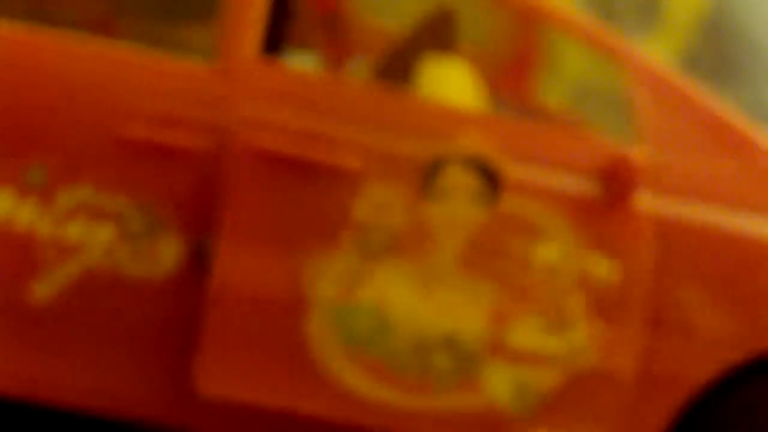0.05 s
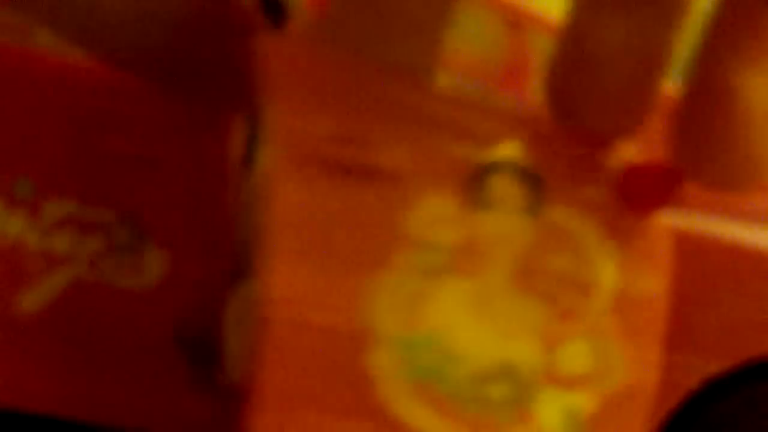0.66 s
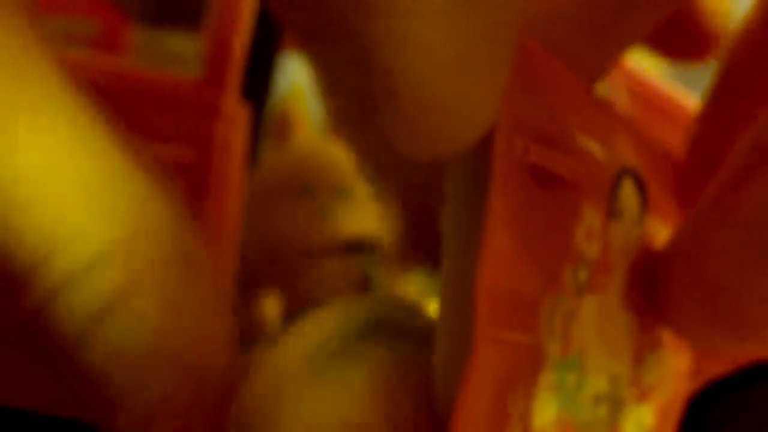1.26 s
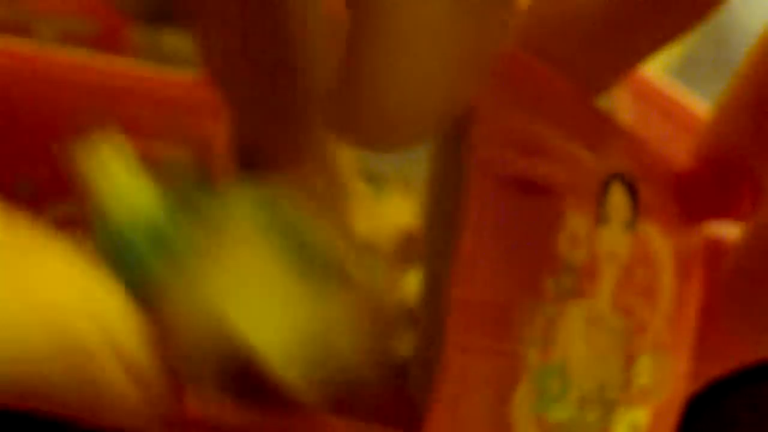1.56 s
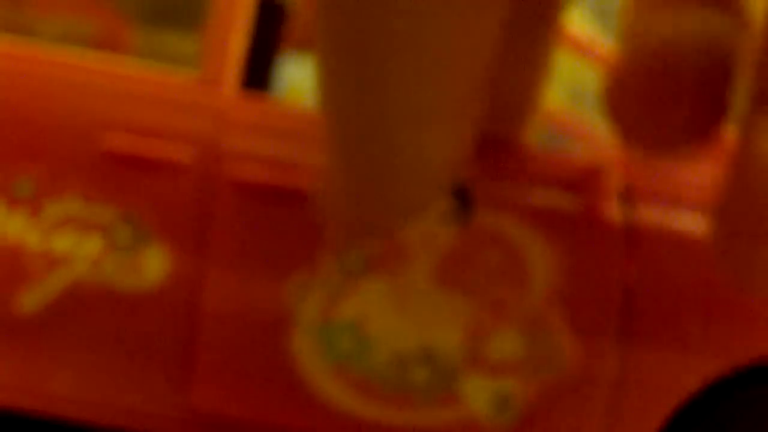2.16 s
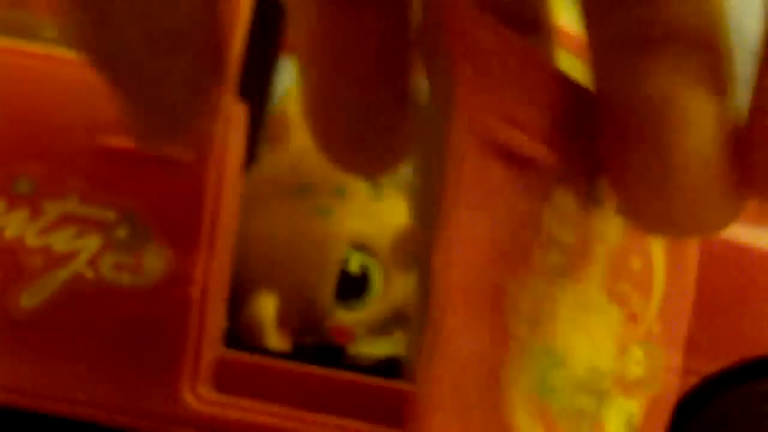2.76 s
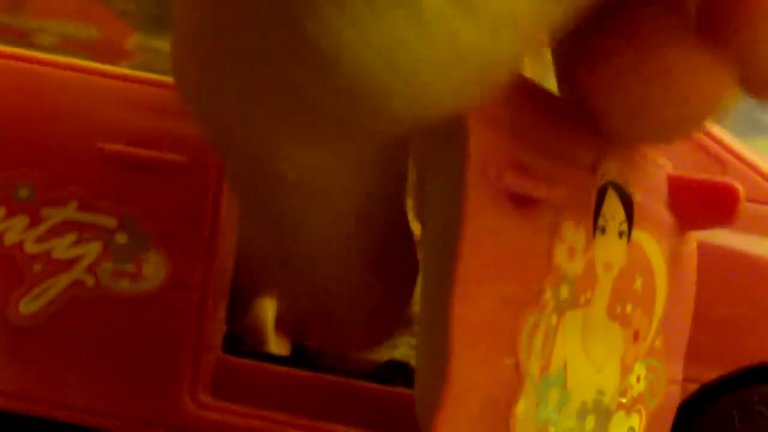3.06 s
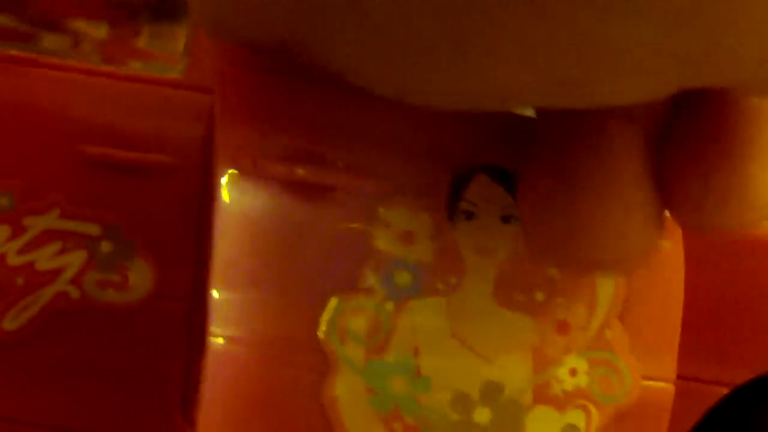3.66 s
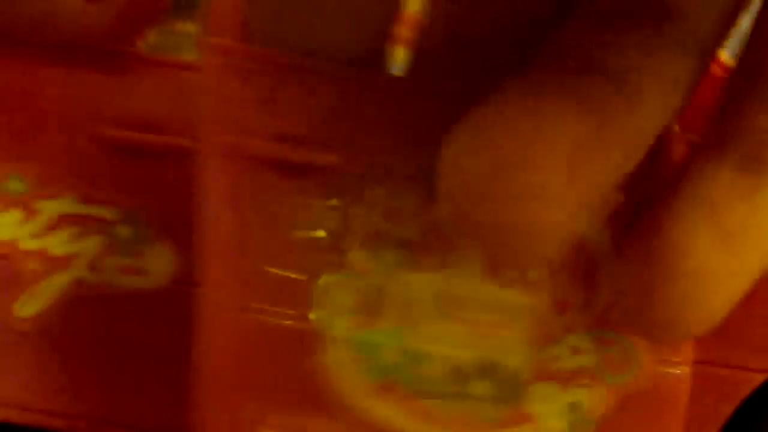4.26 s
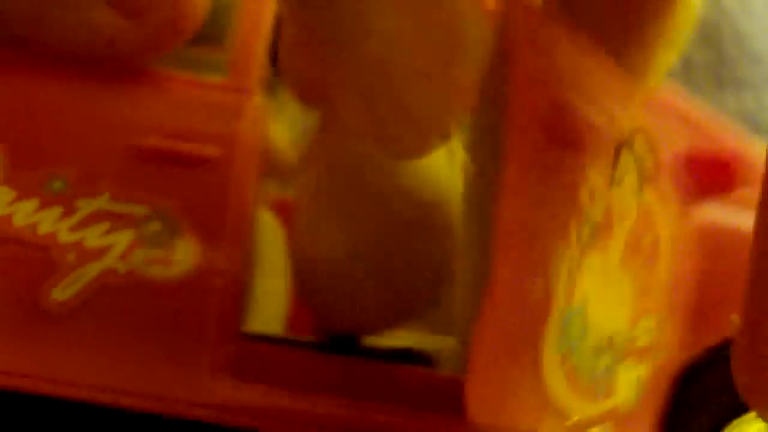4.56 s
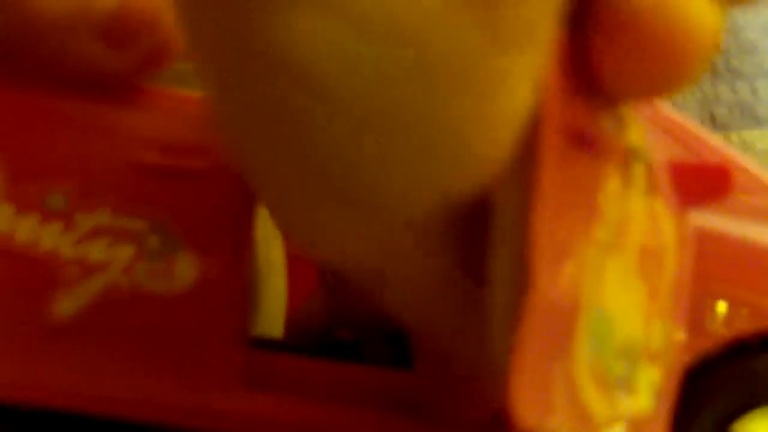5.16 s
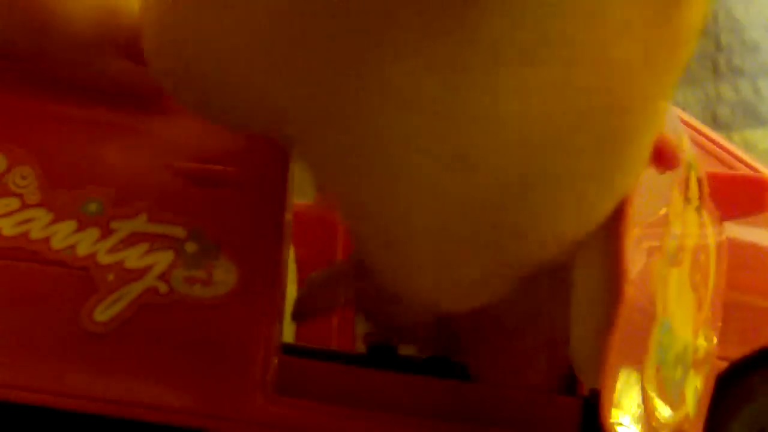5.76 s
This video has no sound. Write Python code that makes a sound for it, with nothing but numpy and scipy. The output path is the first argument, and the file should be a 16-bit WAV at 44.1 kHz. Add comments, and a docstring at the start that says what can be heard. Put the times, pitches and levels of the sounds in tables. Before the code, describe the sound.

Fingers handle a hollow plastic toy car close to the microphone, with soft rubbing and light ticks over faint noise in a small, quiet room. A small knock comes at about 0.7 seconds. From 1 to 1.6 seconds, little figurines tap and slide inside with a brief squeak. At 2.4 seconds the door gives a sharp plastic knock, trailed by smaller ones. A few figurine taps follow around 3 seconds, then the rubbing gets busier, with light knocks and short scrapes on the shell. The loudest snap lands at 4.6 seconds as the door is worked, followed by a quick cluster of bright latch clicks near 4.75 seconds. Another knock comes at about 5.4 seconds, and the figurines clatter briefly around 5.7 seconds. Every contact is short and fairly dry.

```python
"""Fingers rub and bump a hollow plastic toy car, close by, over faint room noise. The shell knocks, small
figurines tap and slide inside, and later the door latch snaps as hands open and shut the door.
Each impact excites the damped modes of a plastic part; rubbing and scraping are stick-slip friction
driving those modes. A small, quiet room answers the louder blows."""
import sys
import numpy as np
from scipy import signal
from scipy.fft import rfft, irfft, next_fast_len
from scipy.io import wavfile
from scipy.ndimage import uniform_filter1d

SR = 44100
rng = np.random.default_rng(int(sys.argv[2]) if len(sys.argv) > 2 else 0)


def bounce(signal):
    """Save signal as a 16-bit WAV file at the path given by the first command-line argument."""
    frames = np.transpose(np.atleast_2d(signal))
    limited = np.clip(frames, -1, 1)
    pcm = np.round(limited * 32767).astype(np.int16)
    wavfile.write(sys.argv[1], SR, pcm)


N = 260187
ATTACK_S, HIT_S = .0075, .2  # the onset that sets a blow's colour; the longest a contact sounds


def undb(db):
    """Decibels to amplitude ratio."""
    return 10 ** (np.asarray(db) / 20)


def unit(x):
    """Normalisation to rms 1."""
    return x / np.sqrt(np.mean(x ** 2) + 1e-18)


def add(track, start_s, sound):
    """Superposition: a sound sums into the track."""
    i = int(start_s * SR)
    track[i:i + len(sound)] += sound[:len(track) - i]


def fade(t, t60):
    """Exponential decay, 60 dB down at t60."""
    return np.exp(-np.log(1000) * t / t60)


def low_cut(x, hz, order=2):
    """Butterworth high-pass."""
    return signal.sosfilt(signal.butter(order, hz, "high", fs=SR, output="sos"), x)


def colour(x, points):
    """Minimum-phase filter through (frequency_hz, gain_db) points, by folding the cepstrum."""
    n = 2 * next_fast_len(len(x) // 2 + 2048)
    hz, db = np.transpose(points)
    f = np.maximum(np.arange(n // 2 + 1) * SR / n, 1)
    cepstrum = irfft(np.log(undb(np.interp(np.log(f), np.log(hz), db))))
    cepstrum[1:n // 2] *= 2
    cepstrum[n // 2 + 1:] = 0
    return irfft(rfft(x, n) * np.exp(rfft(cepstrum)))[:len(x)]


# Spectra of the room's air and rumble: frequency_hz, gain_db
AIR_SPECTRUM = [(100, 3), (180, -13.5), (280, 7), (700, 3), (920, -15), (1300, -0.5), (3000, -10.5),
                (6000, -11), (11000, -15.5), (16000, -21.5)]
RUMBLE_SPECTRUM = [(10, -1), (25, -1), (60, -14), (120, -21), (250, -20.5), (1000, -55.5)]
def background(air_db=-70.0, rumble_db=-68.5, hiss_db=-91):
    """Ambient noise in two channels: the air is coherent, the rumble partly so, the hiss incoherent."""
    air = unit(low_cut(colour(rng.standard_normal(N), AIR_SPECTRUM), hz=90))
    shared = rng.standard_normal(N)
    rumble = np.array([unit(colour(0.73 * shared + rng.standard_normal(N), RUMBLE_SPECTRUM))
                       for _ in range(2)])
    return undb(air_db) * air + undb(rumble_db) * rumble + undb(hiss_db) * rng.standard_normal((2, N))


def press(t, length_s, rise_s, release_s):
    """Contact pressure: a smooth rise, a hold until length_s, an exponential release."""
    return np.sin(np.pi / 2 * np.clip(t / rise_s, 0, 1)) * fade(np.maximum(t - length_s, 0), release_s)


def wander(rate_hz):
    """Low-pass random fluctuation of rms 1: held values, smoothed twice."""
    hold = int(SR / rate_hz)
    steps = np.repeat(rng.standard_normal(N // hold + 1), hold)
    return unit(uniform_filter1d(uniform_filter1d(steps, hold), hold)[:N])


def slips(n, per_s, spread_db):
    """Stick-slip friction: tiny releases at random moments, a few much larger than the rest."""
    size = undb(spread_db * np.minimum(rng.exponential(size=n), 4))
    return unit((rng.random(n) < per_s / SR) * size * rng.choice([-1, 1], n))


def ring(modes, t, t60, scatter_db, detune):
    """Free vibration: a sum of damped modes, weighted and tuned anew by each contact point and grip."""
    hz, db, decay_ratio = np.transpose(modes)[:, :, None]
    weight, pitch = rng.standard_normal((2, len(modes), 1))
    sign = rng.choice([-1, 1], (len(modes), 1))
    amplitude = sign * undb(db + scatter_db * weight) * fade(t, t60 * decay_ratio)
    return np.sum(amplitude * np.sin(2 * np.pi * hz * (1 + detune * pitch) * t), axis=0)


def drive_part(force, modes, t60, wall_db):
    """Forced vibration: the force is convolved with the response of hand-damped modes and walls."""
    t = np.arange(int(HIT_S * SR) // 2) / SR
    modal = unit(ring(modes, t, t60, scatter_db=4, detune=0.037))
    walls = unit(rng.standard_normal(len(t)) * fade(t, t60))
    return signal.fftconvolve(force, modal + undb(wall_db) * walls)[:len(force)]


# Modes of the car's shell: pitch_hz, level_db, t60_ratio
CAR_MODES = [(374, -2.5, 0.92), (546, -2.5, 0.84), (780, -10.5, 1.6), (918, 3, 1.8), (1036, -9, 0.51),
             (1443, -2, 1.4), (1690, -6, 1), (1754, -5, 0.86), (2177, 2, 1), (2300, 0, 0.5),
             (3446, -2.5, 0.31), (3386, 1, 1), (4080, -3.5, 1.7), (4760, -5, 1), (4740, -7, 2.7),
             (6140, -9.5, 0.72), (6730, 5.5, 0.34), (7290, -2, 1.1), (8560, -1, 0.23), (10200, -6, 0.54),
             (10600, -9.5, 1.1), (11400, -17.5, 1)]
# Spectra of the rubbed body and of dry skin: frequency_hz, gain_db
RUB_SPECTRUM = [(100, -23), (220, -16.5), (330, -14.5), (700, 1), (930, -0.5), (1200, 4.5), (1450, -5.5),
                (1900, -8.5), (2700, 1.5), (4500, -17), (7000, -19.5), (16000, -49)]
SKIN_SPECTRUM = [(1500, -25.5), (3500, 0), (6500, 1.5), (9000, 0.5), (11500, -0.5), (13500, -6.5),
                 (16000, -12.5)]
def rubbing(n, skin_db):
    """Sliding friction: skin drags the shell into resonance and hisses above it."""
    drag = drive_part(slips(n, per_s=1400, spread_db=4), CAR_MODES, t60=0.015, wall_db=15)
    hiss = colour(slips(n, per_s=3500, spread_db=4), SKIN_SPECTRUM)
    return unit(colour(drag, RUB_SPECTRUM)) + undb(skin_db) * unit(hiss)


STROKE_RISE_S, STROKE_RELEASE_S = 0.022, 0.23
HOLD_DB = -71.5  # the hand merely holding the toy
# Finger strokes over the toy: start_s, length_s, relative_level_db, skin_over_rub_db
FINGER_STROKES = [(0.0, 0.11, -59, -7), (0.522, 0.073, -64, -8), (0.763, 0.11, -63, -8),
                  (1.969, 0.052, -60, -6), (2.203, 0.18, -77.5, 4), (2.462, 0.16, -59, -3.5),
                  (2.671, 0.063, -61, 1.5), (2.879, 0.082, -64, -9), (3.008, 0.17, -54, -6.5),
                  (3.216, 0.091, -61, -6), (3.379, 0.13, -59.5, -2.5), (3.5, 0.085, -58.5, 0),
                  (3.719, 0.13, -57.5, -10), (4.028, 0.082, -61, -13), (4.188, 0.15, -56.5, -5.5),
                  (4.408, 0.17, -61, -6), (4.604, 0.26, -57, 0.5), (4.923, 0.15, -73.5, 3),
                  (5.129, 0.19, -61, 0), (5.442, 0.074, -63, 0), (5.707, 0.12, -66, -3)]
def fingers(grip_wander_db=2, stroke_trim_db=-1):
    """Amplitude modulation: friction noise follows each stroke's pressure and an unsteady grip."""
    out, t = undb(HOLD_DB) * rubbing(N, skin_db=-2), np.arange(SR // 2) / SR
    for start_s, length_s, db, skin_db in FINGER_STROKES:
        pressure = press(t, length_s, STROKE_RISE_S, STROKE_RELEASE_S)
        add(out, start_s, undb(db + stroke_trim_db) * rubbing(len(t), skin_db) * pressure)
    return out * undb(grip_wander_db * wander(rate_hz=45))


def ticks(per_s=44, tick_db=-8, spread_db=3):
    """Rattle: loose parts tick at random, louder under a stroke; a few modes give each tick its pitch."""
    out, t = np.zeros(N), np.arange(int(HIT_S * SR) // 4) / SR
    for tick_s in rng.random(int(per_s * N / SR)) * N / SR:
        stroking = sum(undb(db) * press(tick_s - start_s, length_s, STROKE_RISE_S, STROKE_RELEASE_S)
                       for start_s, length_s, db, _ in FINGER_STROKES)
        effort = undb(HOLD_DB) + stroking
        tick = unit(colour(ring(CAR_MODES, t, t60=0.033, scatter_db=9, detune=0.065), RUB_SPECTRUM))
        add(out, tick_s, effort * undb(tick_db + spread_db * rng.standard_normal()) * tick)
    return out


# Fingertips bumping the shell: start_s, level_db
FINGERTIP_BUMPS = [(0.1, -64), (2.02, -58), (2.096, -61), (2.226, -62.5), (2.599, -49.5), (4.647, -47),
                   (5.367, -43)]
def thumps(contact_s=0.0012):
    """Contact time limits bandwidth: a soft half-sine push excites mainly the shell's low modes."""
    out, t = np.zeros(N), np.arange(int(HIT_S * SR)) / SR
    push = np.sin(np.pi * np.minimum(t / contact_s, 1))
    for start_s, db in FINGERTIP_BUMPS:
        bump = low_cut(drive_part(push, CAR_MODES, t60=0.022, wall_db=0), hz=300, order=4)
        add(out, start_s, undb(db) * bump / np.std(bump[:int(ATTACK_S * SR)]))
    return out


# Bands of a contact's thud, hollowness, level and edge: low_hz, high_hz
CONTACT_BANDS = [(200, 700), (700, 2000), (2000, 6000), (6000, 16000)]
def balance(x, span_s, db, hollow_db, edge_db, thud_db=-11.5, thud_slope=0.74):
    """Spectral balance of the first span_s: db sets 2-6 kHz, the other bands are relative to it."""
    wanted_db = db + np.array([thud_db + thud_slope * hollow_db, hollow_db, 0, edge_db])
    knees_hz = np.ravel([(lo * 1.2, hi / 1.2) for lo, hi in CONTACT_BANDS])
    n = int(span_s * SR)
    size = n + 2048
    f = np.arange(size // 2 + 1) * SR / size
    for _ in range(3):
        power = 2 * abs(rfft(x[:n], size)) ** 2 / (size * n)
        band_power = np.array([power[(f >= lo) & (f < hi)].sum() for lo, hi in CONTACT_BANDS])
        gain_db = wanted_db - 10 * np.log10(band_power + 1e-18)
        x = colour(x, np.column_stack([knees_hz, np.repeat(gain_db, 2)]))
    return x


# Spectrum of an impact's crack and wall ringing: frequency_hz, gain_db
CRACK_SPECTRUM = [(100, -5), (220, -17.5), (380, 0.5), (900, 4), (3000, 5.5), (6000, -2), (10000, -5.5),
                  (13000, -10), (16000, -19)]
def impacts(table, modes, ring_s, contact_s, crack_db, wall_db, wall_t60_ratio, scatter_db, detune):
    """Impulse excitation: a sharp crack, a part's main modes and the dense ringing of its thin walls."""
    out, t = np.zeros(N), np.arange(int(HIT_S * SR)) / SR
    for start_s, db, hollow_db, edge_db in table:
        t60 = ring_s * np.exp(-0.003 * (db + 43.5))  # louder blows die away slightly sooner
        crack_noise, wall_noise = rng.standard_normal((2, len(t)))
        crack = undb(crack_db) * unit(crack_noise * fade(t, t60=0.012))
        walls = undb(wall_db) * unit(wall_noise * fade(t, t60 * wall_t60_ratio))
        modal = unit(ring(modes, t, t60, scatter_db, detune))
        hit = (modal + colour(crack + walls, CRACK_SPECTRUM)) * np.minimum(t / contact_s, 1)
        add(out, start_s, balance(hit, ATTACK_S, db, hollow_db, edge_db))
    return out


# Knocks on the shell: start_s, level_db, hollow_db, edge_db
CAR_KNOCKS = [(0.185, -68, 9.5, 8.5), (0.2966, -60.5, 8, -7), (0.3919, -54, -4, -21), (0.4045, -55, -7, -4),
              (0.599, -56.5, 8.5, -5), (0.7325, -42, -3, -0.5), (0.7792, -48.5, -2, -3),
              (0.8305, -56, 3.5, -3.5), (1.9824, -60, -9, -27), (2.028, -57.5, -4, 0.5),
              (2.3861, -24, -5.5, -0.5), (2.4107, -35, -3.5, -3.5), (2.4611, -39, -6, -2),
              (2.48, -53, 6.5, -5), (2.7134, -65.5, 14, 2), (2.9271, -58.5, 2, -10), (2.9912, -65, 9, -4),
              (3.398, -55, 6.5, -5.5), (3.4183, -65, 10, -10), (3.4607, -55, 6.5, -8),
              (3.476, -53.5, 4.5, -1), (3.5275, -51.5, 2, -9), (3.7299, -53.5, 1, -11),
              (3.8488, -63, 12, -18), (3.88, -54, -13, -26), (3.892, -51, -7, -10),
              (3.9373, -46.5, -7, -11), (3.958, -53.5, 4, -8.5), (3.9988, -51, -2, -11),
              (4.1149, -69, 10.5, -19), (4.2235, -53.5, -24, -3.5), (4.252, -53, -5, -7),
              (4.2641, -47.5, -1.5, -17), (4.2925, -50, -6, -5), (4.313, -52, -4, 1.5),
              (4.3541, -51, -4, -12.5), (4.4412, -51.5, -2, -15), (4.5186, -44, 2, -17),
              (4.5342, -45.5, -5, 6.5), (4.541, -43.5, 5.5, -8), (4.5609, -52, -8, 5.5),
              (4.5995, -16, -5.5, -1), (4.611, -38, -1, 8.5), (4.8103, -52, 1.5, -1),
              (4.8462, -60.5, 10.5, 7), (4.8663, -47, -2.5, -7), (5.364, -40, -9.5, 7),
              (5.3685, -34.5, -5, -5)]
def shell_knocks():
    """The striking point sets the timbre: mid-panel sounds hollow, a hard corner gives edge."""
    return impacts(CAR_KNOCKS, CAR_MODES, ring_s=0.036, contact_s=0.0009, crack_db=6.0,
                   wall_db=4, wall_t60_ratio=1.04, scatter_db=3.5, detune=0.008)


# Spectrum of scraped plastic: frequency_hz, gain_db
SCRAPE_SPECTRUM = [(100, -44.5), (350, -16.5), (950, 2.5), (2000, 1.5), (3200, 4), (4700, -0.5), (6600, 3),
                   (9000, -5), (12000, -4), (16000, -16)]
def scrapes(table, modes, t60, wall_db, spread_db, slips_per_s=2500):
    """Stick-slip excitation: a dense run of slips swells with pressure and fades when the part stops."""
    out, t = np.zeros(N), np.arange(int(HIT_S * SR)) / SR
    for start_s, length_s, db, hollow_db, edge_db in table:
        pressure = press(t, length_s, rise_s=0.43 * length_s, release_s=0.074)
        friction = slips(len(t), slips_per_s, spread_db) * pressure
        scrape = colour(drive_part(friction, modes, t60, wall_db), SCRAPE_SPECTRUM)
        add(out, start_s, balance(scrape, length_s, db, hollow_db, edge_db))
    return out


# The door or a fingertip sliding on the shell: start_s, length_s, level_db, hollow_db, edge_db
CAR_SLIDES = [(0.392, 0.018, -56.5, -3, -12), (0.768, 0.028, -54, -0.5, -3), (0.828, 0.012, -50, 3.5, -4),
              (1.825, 0.063, -62.5, -0.5, 0.5), (2.122, 0.045, -63, -17, 1), (3.735, 0.04, -52, -6, 0.5),
              (4.498, 0.04, -45.5, -4.5, -4), (4.553, 0.024, -47.5, -2.5, 0), (5.26, 0.089, -57.5, -2, 2)]
def shell_swishes():
    """Heavy damping broadens the shell's resonances, so friction gives a swish."""
    return scrapes(CAR_SLIDES, CAR_MODES, t60=0.0063, wall_db=6, spread_db=3)


# Modes of a figurine in the cabin: pitch_hz, level_db, t60_ratio
FIGURE_MODES = [(511, 10.5, 0.79), (927, -12.5, 1.73), (1294, -14.5, 2.3), (1462, 4.5, 0.73),
                (1642, -7.5, 1), (2270, -11.5, 1.5), (2610, -0.5, 0.85), (2874, -0.5, 0.55),
                (3324, 2, 0.37), (4460, 0, 0.32), (4870, -8.5, 1.1), (6500, -4, 0.7), (7860, 7.5, 0.39),
                (11400, -9, 0.42)]
# Figurines striking the cabin: start_s, level_db, hollow_db, edge_db
FIGURE_TAPS = [(0.9887, -59, 4, -1.5), (1.0281, -53, 1.5, -5.5), (1.0905, -35, -9, 2),
               (1.2056, -51.5, 5, -4), (1.2287, -52, 1.5, 0.5), (1.2342, -54, 4, -2.5),
               (1.5074, -47, -5.5, -5.5), (1.5615, -50.5, -12, -7.5), (1.5763, -54.5, 8, -6),
               (3.0336, -47.5, -5, -8), (3.1019, -44, 0, -13), (3.2208, -55, -12, -8),
               (3.2665, -58, 9.5, -18), (5.133, -49.5, -1.5, -6), (5.227, -52.5, 0, 6),
               (5.4312, -44, 1, -5), (5.6284, -60.5, 7, 5), (5.6864, -43, -8, -5),
               (5.6941, -34.5, -1.5, -2.5), (5.7035, -48.5, 6.5, -3), (5.7128, -41, -4, -3),
               (5.7657, -52.5, 2, -7)]
def figurine_taps():
    """Modal ringing: each tap on the cabin excites a different mix of a figurine's modes."""
    return impacts(FIGURE_TAPS, FIGURE_MODES, ring_s=0.04, contact_s=0.0006, crack_db=0.5,
                   wall_db=-2.0, wall_t60_ratio=1.3, scatter_db=6.5, detune=0.013)


# A figurine sliding in the cabin: start_s, length_s, level_db, hollow_db, edge_db
FIGURE_SLIDES = [(1.091, 0.035, -44.5, -2.5, -2.5), (1.418, 0.018, -49, -9, 3), (1.528, 0.022, -63, 3, -1)]
def figurine_squeaks():
    """Resonance: a sliding figurine's modes filter the friction into a brief squeak."""
    return scrapes(FIGURE_SLIDES, FIGURE_MODES, t60=0.014, wall_db=-4.5, spread_db=2)


# Modes of the door latch: pitch_hz, level_db, t60_ratio
DOOR_LATCH_MODES = [(467, -3, 0.99), (870, -3.5, 0.53), (1150, -2, 1.5), (1954, -4.5, 1.6),
                    (3730, -5.5, 0.93), (4830, 6, 0.7), (5720, 8, 0.91), (7150, -6, 1), (10150, 8.5, 0.19),
                    (10100, -11.5, 1), (9460, 5, 1.4), (10680, 10, 0.34), (12000, -1.5, 0.72)]
# The latch and hinge slipping: start_s, level_db, hollow_db, edge_db
DOOR_CLICKS = [(3.4935, -62.5, -2, 14.5), (4.5933, -34, -4, 8), (4.6668, -64, -10, 16.5),
               (4.6945, -68.5, -10, 20.5), (4.738, -37.5, -7, -10), (4.7436, -33.5, -14, 7),
               (4.7564, -31, -3, 2)]
def latch_clicks():
    """Sudden release: the slipping latch rings its high modes with a very fast attack."""
    return impacts(DOOR_CLICKS, DOOR_LATCH_MODES, ring_s=0.036, contact_s=0.00041, crack_db=0,
                   wall_db=3, wall_t60_ratio=1.5, scatter_db=3.5, detune=0.0038)


# Spectrum of the room's reflections: frequency_hz, gain_db
REVERB_SPECTRUM = [(100, -2), (350, -0.5), (1000, -2.5), (3000, -5), (7000, -12.5), (16000, -2.5)]
def room(x, wet_db=-17, t60=0.15, first_echo_s=0.0071):
    """Reverberation: the diffuse field of a small furnished room follows the direct sound."""
    t = np.arange(SR // 2) / SR
    tail = rng.standard_normal(len(t)) * fade(t, t60) * np.clip(t / first_echo_s - 1, 0, 1)
    response = unit(colour(tail, REVERB_SPECTRUM)) / np.sqrt(len(t))
    return x + undb(wet_db) * signal.fftconvolve(x, response)[:N]


def scene():
    """Superposition: all the handling sums to one source straight ahead, over the ambient noise."""
    blows = shell_knocks() + figurine_taps() + latch_clicks()
    slides = figurine_squeaks() + shell_swishes()
    toy = blows + slides + thumps() + fingers() + ticks()
    radiated = low_cut(toy, hz=170, order=3)  # a small hollow body radiates little bass
    return room(radiated) + background()


def record(dry, notch_hz=7850, notch_q=9, top_hz=16200):
    """Cancellation in the microphone port removes a narrow band; a steep low-pass cuts the top."""
    ported = signal.lfilter(*signal.iirnotch(notch_hz, notch_q, fs=SR), dry)
    return signal.sosfilt(signal.ellip(10, .2, 80, top_hz, fs=SR, output="sos"), ported)


dry = scene()
out = record(dry)
bounce(out)
```